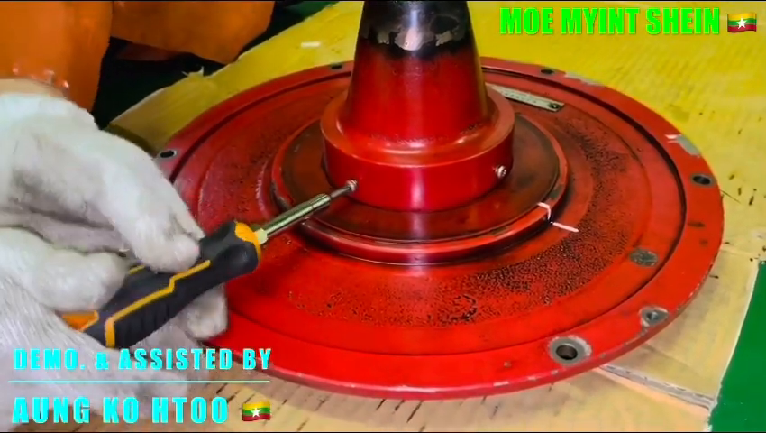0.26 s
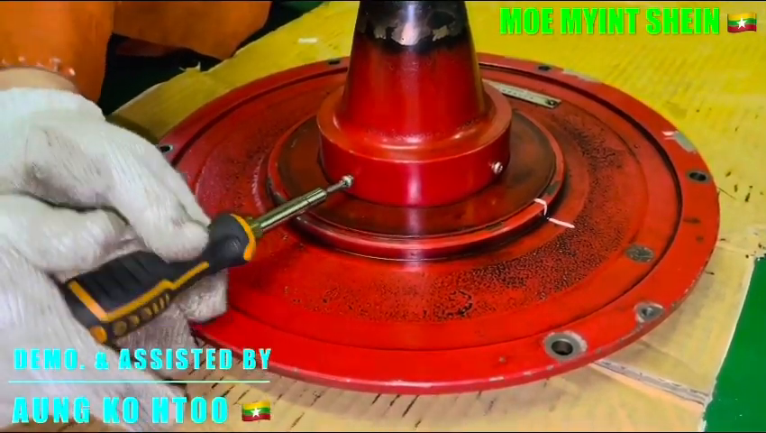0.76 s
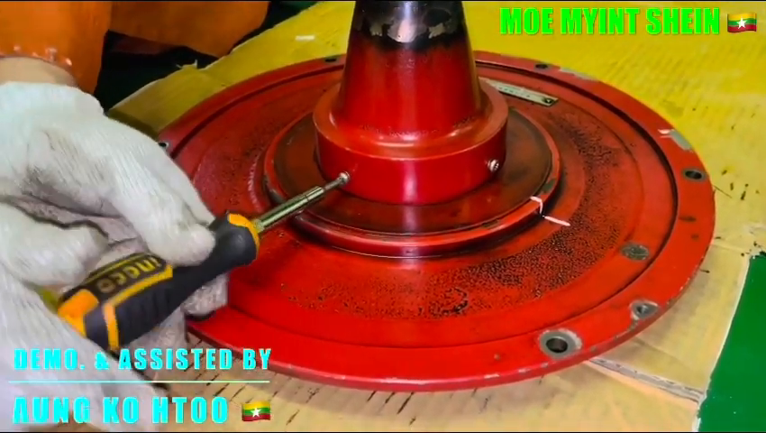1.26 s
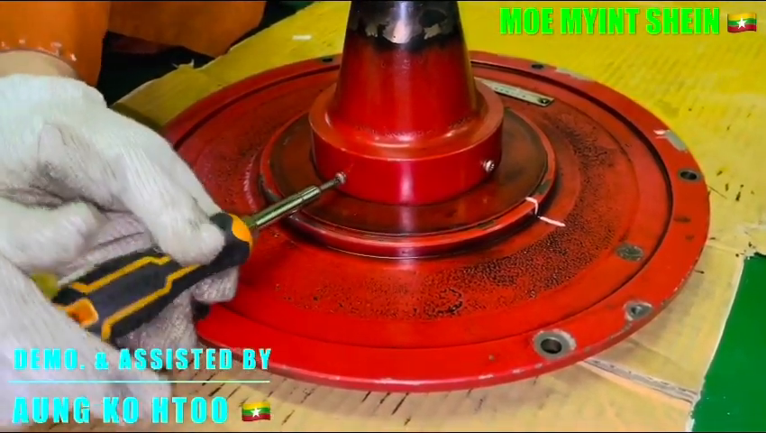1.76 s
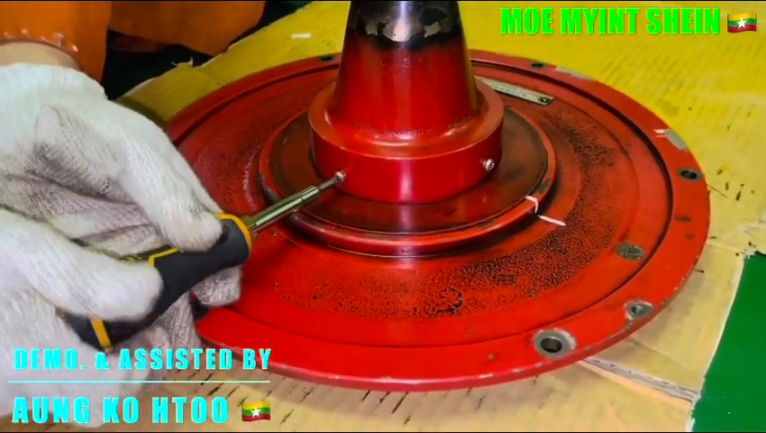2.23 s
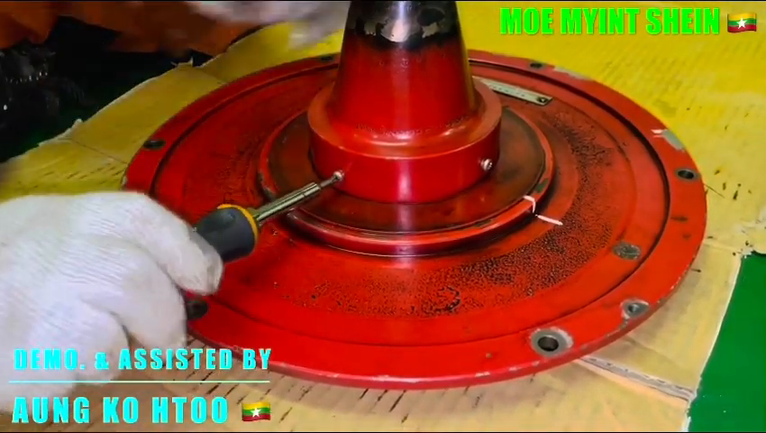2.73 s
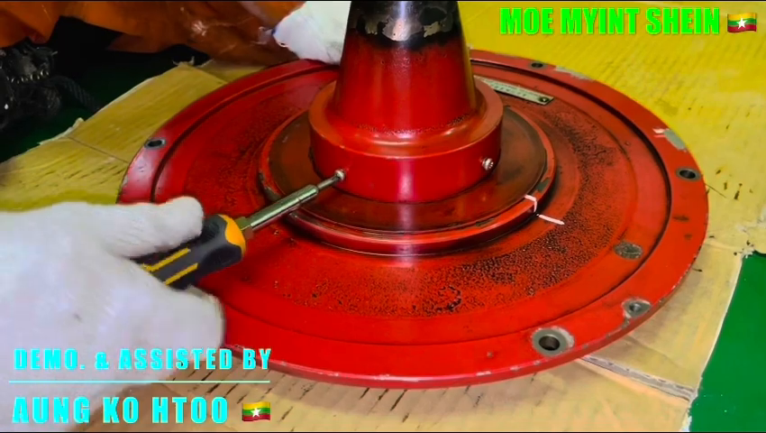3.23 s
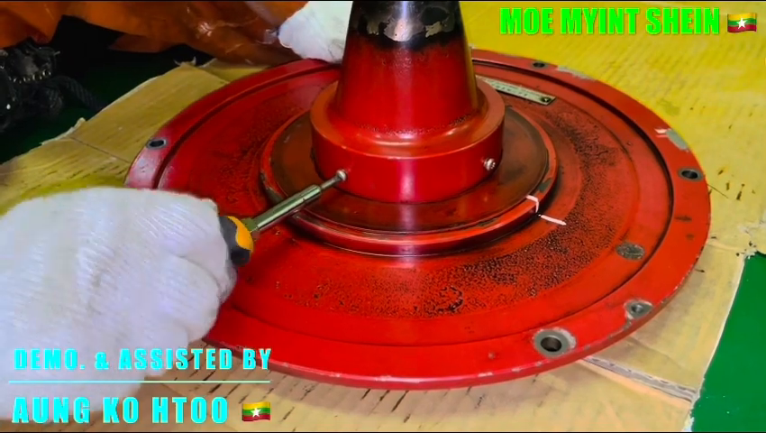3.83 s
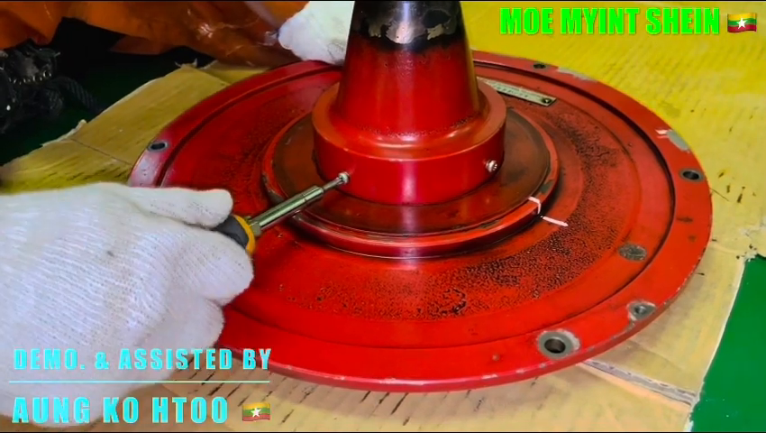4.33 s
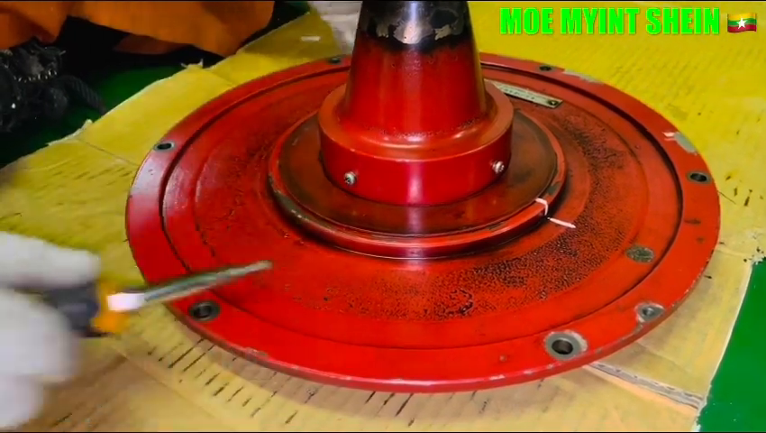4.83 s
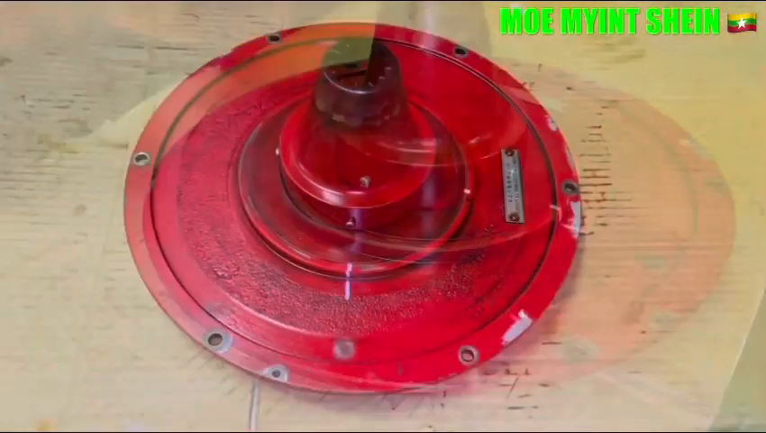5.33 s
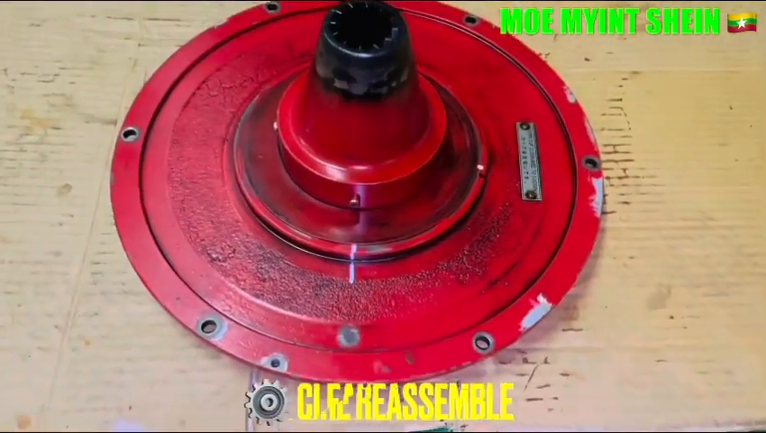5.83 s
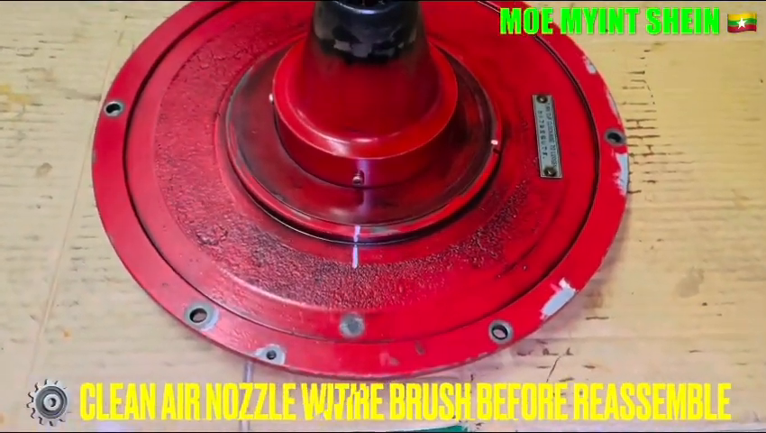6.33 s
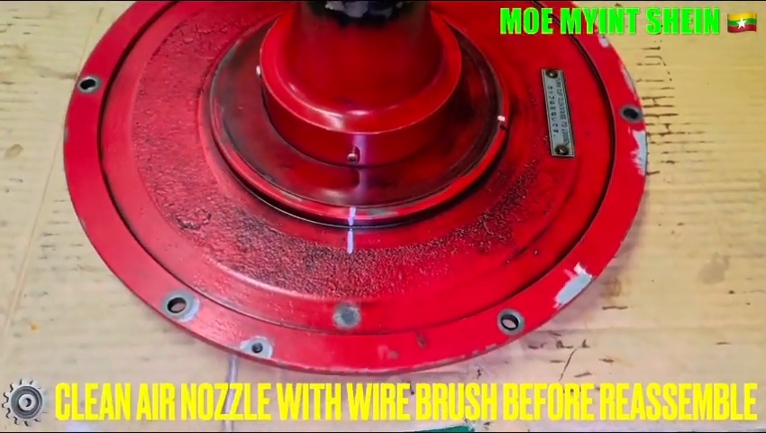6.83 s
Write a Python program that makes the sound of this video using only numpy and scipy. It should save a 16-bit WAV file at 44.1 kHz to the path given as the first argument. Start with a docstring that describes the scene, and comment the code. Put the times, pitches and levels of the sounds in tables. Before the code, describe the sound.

Constant low engine-room rumble: rapid diesel throbbing, dull mechanical clatter and ventilation roar, with a barely noticeable airy hiss swelling on top.

```python
"""A diesel generator, some way off in a ship's engine room, runs steadily at about 900 turns a minute.
Its firings throb through the steel hull and its valves and gears clatter: harmonics of one engine cycle.
Fans and pumps add a booming roar, which is noise shaped by room resonances, and a few wavering whines.
A faint hiss, high-pitched filtered noise, swells and fades on top."""
import sys
import numpy as np
from scipy import signal
from scipy.fft import rfft, irfft
from scipy.io import wavfile

SR = 44100
rng = np.random.default_rng(int(sys.argv[2]) if len(sys.argv) > 2 else 0)


def inscribe(sig):
    """Save sig as 16-bit PCM at rate SR to the path in sys.argv[1].

    A 1-D sig is mono; a 2-D sig holds one channel per row.
    Samples are clipped to [-1, 1] before scaling.
    """
    pcm = np.round(np.clip(np.atleast_2d(sig).T, -1, 1) * 32767)
    wavfile.write(sys.argv[1], SR, pcm.astype(np.int16))


N = 312669

CYCLE_HZ = 7.48144  # one four-stroke cycle takes two turns of the crank
TIME = np.arange(N) / SR
BINS_HZ = np.fft.rfftfreq(N, 1 / SR)


def gain_of(db):
    """Amplitude ratio: 20 dB is a factor of ten."""
    return 10 ** (np.asarray(db) / 20)


def read(points, hz):
    """Spectral envelope: joins its points by straight lines of level over log frequency."""
    point_hz, level_db = np.transpose(points)
    return np.interp(np.log(hz + 1), np.log(point_hz + 1), level_db)


def noise(density):
    """Spectral shaping: white noise filtered to the given amplitude per root Hz in each bin."""
    white = rfft(rng.standard_normal(N))
    return irfft(white * density * np.sqrt(SR / 2), N)


def drift(rate_hz):
    """Narrow-band modulation: low-passed noise without a constant part, scaled to rms 1."""
    slow = noise(np.exp(-(BINS_HZ / rate_hz) ** 2) * (BINS_HZ > 0))
    return slow / slow.std()


def repeat(multiples, db, phase, cycles, size=16384):
    """Fourier synthesis: sums lines of given rms level into one cycle, repeated with the crank."""
    lines = np.zeros(size // 2 + 1, complex)
    lines[np.round(multiples).astype(int)] = gain_of(db) * np.exp(1j * phase)
    one_cycle = irfft(lines, size) * size / np.sqrt(2)
    return np.interp(cycles, np.arange(size) / size, one_cycle, period=1)


def crank():
    """Phase modulation: cycles completed, as the governor hunts and firing times vary slightly."""
    first_cycle_s = .053
    hunt_s, jitter_s = .00007, .000018  # rms timing error, slow and quick
    timing_error_s = hunt_s * drift(.5) + jitter_s * drift(8.8)
    return CYCLE_HZ * (TIME - first_cycle_s + timing_error_s)


def throb(cycles, unsteady=0.036):
    """Dispersion: the hull delays higher lines more, smearing each firing pulse over the cycle."""
    # low harmonics of the engine cycle: multiple, level_db
    throb_lines = [(4, -62.5), (5, -48), (6, -40), (7, -59), (8, -46.5), (9, -44.5), (10, -35), (11, -50),
                   (12, -59), (13, -46.5), (14, -35), (15, -60.5), (16, -66)]
    multiples, level_db = np.transpose(throb_lines)
    phase = -3 / 8 * np.pi * multiples ** 2  # a quadratic phase makes delay grow with frequency
    return repeat(multiples, level_db, phase, cycles) * (1 + unsteady * drift(2.8))


def clatter(cycles, trim_db=-.5, scatter_db=3.0, unsteady=.12):
    """Periodicity: valves, injectors and gears recur each cycle, phases scrambled by the steel room."""
    # mean level of the ordinary harmonics, before trim and scatter: line_hz, level_db
    clatter_envelope = [(130, -64.5), (250, -72), (350, -76.5), (470, -77), (570, -88), (750, -86),
                        (880, -89), (1100, -82.5), (1350, -88), (1850, -89), (2200, -99), (2850, -102.3),
                        (3200, -107.9), (4000, -116.3)]
    # harmonics on a resonance of the casing or on a gear mesh: multiple, level_db
    ringing_lines = [(20, -57.5), (22, -63), (25, -58.5), (27, -63.5), (29, -58), (30, -57.5), (31, -62.5),
                     (34, -61.5), (37, -59), (38, -66.5), (39, -67.5), (42, -63), (45, -63.5), (47, -69),
                     (51, -68), (52, -70.5), (54, -65.5), (60, -70), (61, -68), (66, -77.5), (71, -73),
                     (89, -73), (98, -75), (103, -74.5), (126, -76), (136, -73), (140, -76), (144, -73),
                     (151, -71), (155, -78.5), (158, -74), (168, -82.5), (170, -79), (188, -76), (202, -81),
                     (220, -85.5), (227, -82), (251, -80)]
    multiples = np.arange(17, 540)  # starts just above the throb
    scatter = scatter_db * rng.uniform(-1.8, 1.9, len(multiples))
    level_db = read(clatter_envelope, multiples * CYCLE_HZ) + trim_db + scatter
    strong, strong_db = np.transpose(ringing_lines)
    level_db[np.searchsorted(multiples, np.round(strong))] = strong_db
    phase = rng.uniform(0, 2 * np.pi, len(multiples))
    return repeat(multiples, level_db, phase, cycles) * (1 + unsteady * drift(18))


def room_ripple(depth_db=1.6, spacing_hz=22.03):
    """Interference: crossing reflections lift some frequencies and sink others."""
    grid_hz = np.arange(0, SR / 2, spacing_hz)
    ripple = rng.standard_normal(len(grid_hz))
    return gain_of(depth_db * np.interp(BINS_HZ, grid_hz, ripple))


def roar(cycles, pulsing=0.052, top_hz=2966.0):
    """Resonance: turbulent noise stirs room modes and pulses a little with the firings."""
    # turbulence of ventilation and combustion, before ripple and roll-off: point_hz, density_db_per_hz
    roar_spectrum = [(16, -92.5), (24, -77.5), (40, -60.5), (85, -61), (115, -67), (155, -83), (260, -73.5),
                     (340, -80.5), (450, -84.5), (570, -90), (1100, -93), (1750, -97.5), (2200, -102),
                     (2900, -101.5)]
    # standing waves of room and panels: mode_hz, width_hz (centre to -6 dB), peak_db_per_hz
    boom_modes = [(43.3, 4.3, -57.5), (74, 7.2, -62.5), (136.7, 2.6, -67.5), (177, 5.9, -66),
                  (198.6, 4, -60.5), (233.5, 9.4, -66), (291.8, 10, -72.5), (425, 17, -80.5),
                  (643, 5.4, -89), (761, 55, -87.5), (1260, 12, -89.5), (1432, 12, -89.5),
                  (1768, 10, -91.5), (1823, 21, -90.5), (1970, 14, -98), (2830, 130, -100),
                  (3360, 27, -108), (3770, 20, -108)]
    turbulence = gain_of(read(roar_spectrum, BINS_HZ)) * room_ripple()
    power = turbulence ** 2 / (1 + (BINS_HZ / top_hz) ** 16)  # steep roll-off above top_hz
    for mode_hz, width_hz, peak_db in boom_modes:
        detuning = (BINS_HZ - mode_hz) / width_hz
        power = power + gain_of(peak_db) ** 2 / (1 + detuning ** 2) ** 2
    firing = np.cos(2 * np.pi * 4 * cycles)  # four pulses a cycle
    return noise(np.sqrt(power)) * (1 + pulsing * firing)


def whines(waver_rad=0.55, flutter=.3):
    """Tonal radiation: sinusoids of smaller machines, each wavering in phase and strength."""
    # hums and whines of pump motors and fans: tone_hz, level_db (rms, without flutter)
    whine_tones = [(59.2, -47), (87.8, -56), (118.3, -54), (197.5, -60), (268.3, -60), (726.8, -81),
                   (763.8, -78.5), (805, -80), (819.8, -73), (1052.6, -77), (1085.9, -76), (1302.9, -82),
                   (1539.7, -80), (1695.7, -80.5), (2848, -87), (2896, -88.5)]
    total = np.zeros(N)
    for tone_hz, level_db in whine_tones:
        strength = gain_of(level_db) * np.sqrt(2) * (1 + flutter * drift(2.5))
        total += strength * np.sin(2 * np.pi * tone_hz * TIME + waver_rad * drift(2))
    return total


def hiss(rest_db=-0.53, flicker_db=0.36):
    """Amplitude modulation: airy noise flickers about a resting level and swells now and then."""
    # airy noise before the level changes: point_hz, density_db_per_hz
    hiss_spectrum = [(1500, -116), (3700, -109), (5000, -114), (7000, -116), (9000, -117.7),
                     (10300, -121.5), (11500, -117.8), (12600, -115.8), (14000, -119), (15700, -122)]
    # swells of the hiss: crest_s, lift_db
    swell_arches = [(.35, .6), (1.18, 0.7), (3.08, 2), (3.95, 2), (5.08, 1.1), (6.05, 2), (7.0, 0.8)]
    arch_s = .9  # full length of each smooth rise and fall
    swell_db = np.zeros(N)
    for crest_s, lift_db in swell_arches:
        position = np.clip((TIME - crest_s) / arch_s, -.5, .5)
        swell_db += lift_db * np.cos(np.pi * position) ** 2
    level_db = rest_db + swell_db + flicker_db * drift(40)
    return noise(gain_of(read(hiss_spectrum, BINS_HZ))) * gain_of(level_db)


def scene():
    """Superposition: one crank drives throb, clatter and the pulse of the roar; whines and hiss add."""
    cycles = crank()
    mix = throb(cycles) + clatter(cycles) + roar(cycles) + whines() + hiss()
    return mix[None]  # one channel


def record(dry):
    """Band limitation: a linear-phase low-pass filter removes the highest treble."""
    edge_hz = 15750
    taps = signal.firwin(1023, edge_hz, window=("kaiser", 9), fs=SR)
    return signal.oaconvolve(dry, taps[None], "same")


dry = scene()
out = record(dry)
inscribe(out)
```